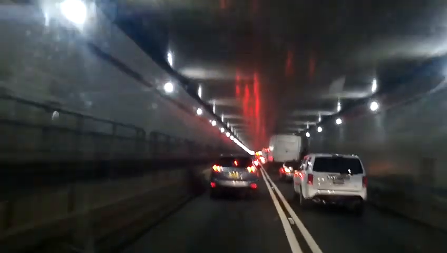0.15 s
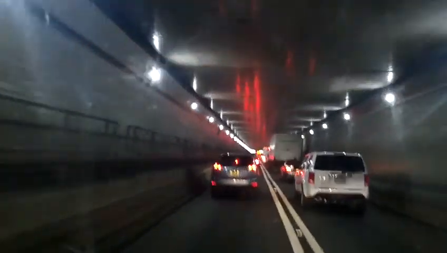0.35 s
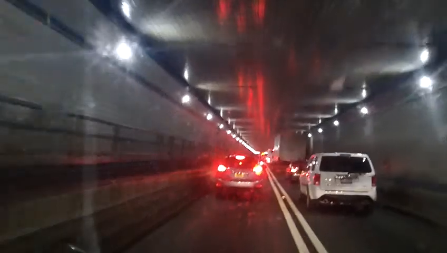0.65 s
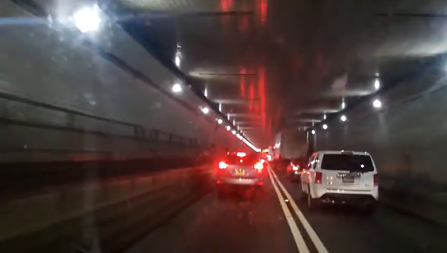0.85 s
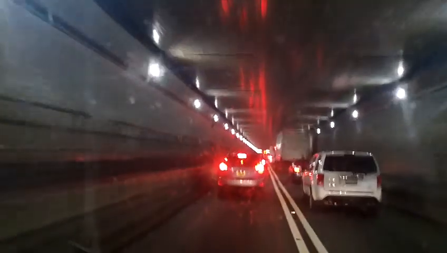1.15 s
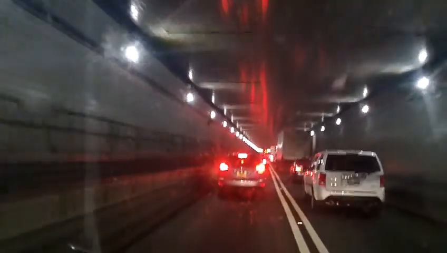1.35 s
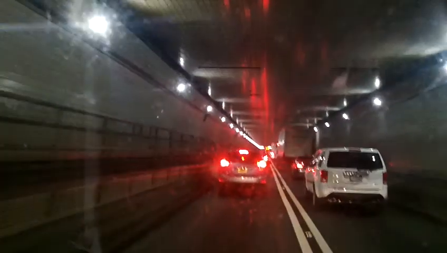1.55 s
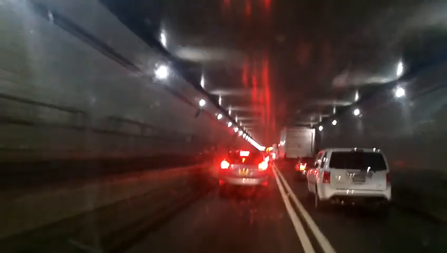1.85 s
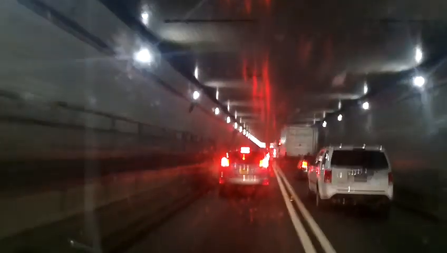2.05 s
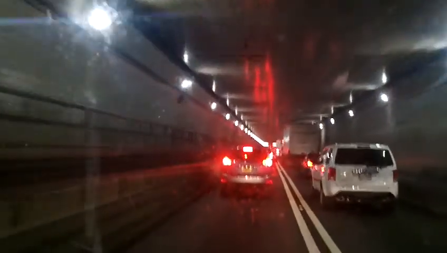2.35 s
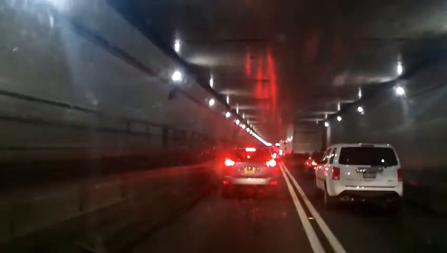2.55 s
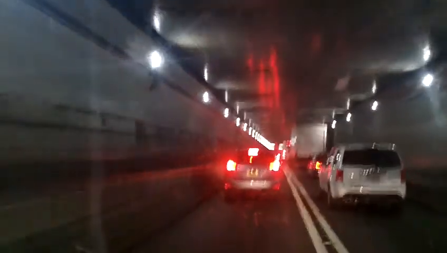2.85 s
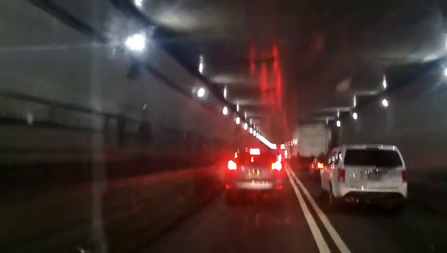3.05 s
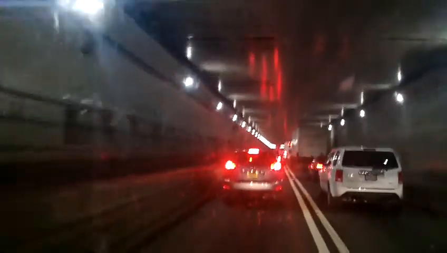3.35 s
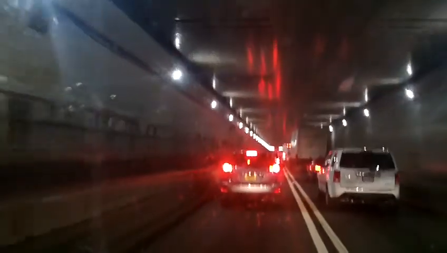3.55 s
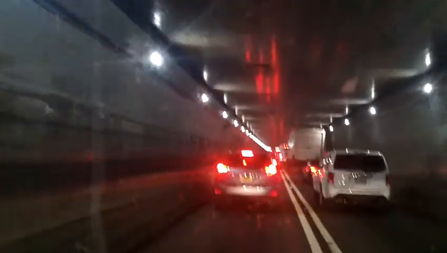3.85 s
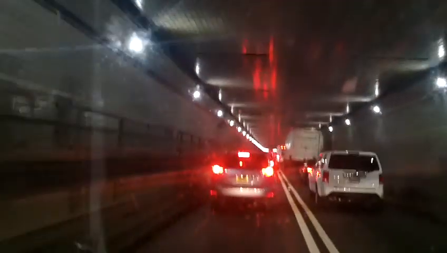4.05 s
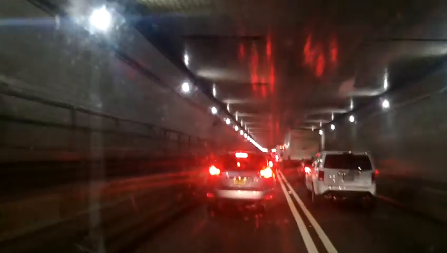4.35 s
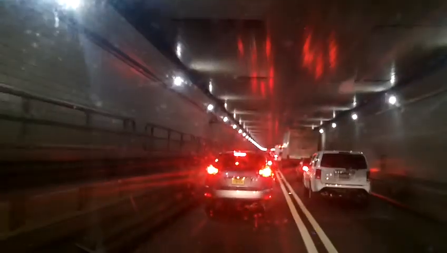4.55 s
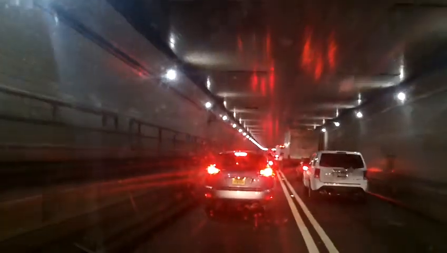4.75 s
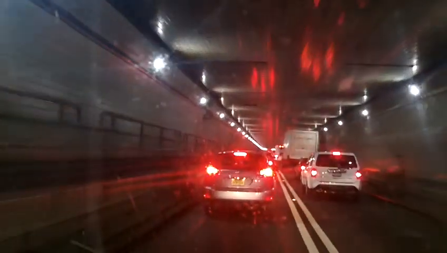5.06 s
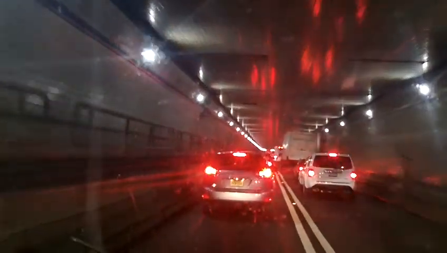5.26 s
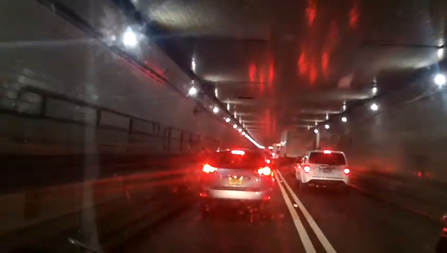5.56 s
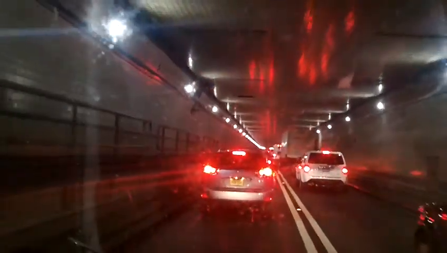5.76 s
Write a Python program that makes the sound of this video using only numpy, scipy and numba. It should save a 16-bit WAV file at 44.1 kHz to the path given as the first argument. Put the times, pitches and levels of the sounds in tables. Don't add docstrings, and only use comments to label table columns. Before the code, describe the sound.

A small camera microphone in a car cabin picks up heavy low rumble and fluttering thuds, around eighteen a second, swelling and easing over rough patches. A low engine hum and muffled tunnel roar sit underneath. Brief high plastic squeaks tick in midway. Near the end the car almost stops, the bumping fades, and a soft idle hum returns.

```python
import sys
import numpy as np
from scipy import signal
from scipy.fft import rfft, irfft, next_fast_len
from scipy.io import wavfile
from scipy.ndimage import uniform_filter1d
from numba import njit

SR = 44100
rng = np.random.default_rng(int(sys.argv[2]) if len(sys.argv) > 2 else 0)


def decibels_to_gain(level_db):
    exponent = np.asarray(level_db, float) / 20
    return 10 ** exponent


def master_out(mix):
    frames = np.transpose(np.atleast_2d(mix))
    ceiling = np.clip(frames, -1, 1)
    pcm = np.round(ceiling * 32767).astype(np.int16)
    wavfile.write(sys.argv[1], SR, pcm)


N = 260631


def evened(x):
    return x / np.sqrt(np.mean(x ** 2) + 1e-20)


def curve(rows, column):
    rows = np.array(rows)
    return np.interp(np.arange(N) / SR, rows[:, 0], rows[:, column])


def coloured(x, db_of_hz):
    size = next_fast_len(N + SR)
    return irfft(rfft(x, size) * decibels_to_gain(db_of_hz(np.fft.rfftfreq(size, 1 / SR))), size)[:N]


def shaped(x, points):
    point_hz, point_db = np.transpose(points)
    return coloured(x, lambda hz: np.interp(np.log(hz + 1), np.log(point_hz + 1), point_db))


def resonant_noise(centre_hz, width_hz):
    noise = rng.standard_normal(N)
    return evened(coloured(noise, lambda hz: -20 * np.log10(1 + ((hz - centre_hz) / width_hz) ** 2)))


# start_s, level_db, length_s
ROAD_PATCHES = [(-.1, -12, .17), (0.089, 0, 0.0091), (.197, -4, 0.026), (.29, -0.5, 0.062),
                (0.45, 13.5, 0.039), (0.574, -2.5, 0.025), (0.704, 9, .05), (0.97, 1.5, 0.066),
                (1.106, 1.5, .18), (1.216, -2.5, .07), (1.539, 5, 0.05), (1.673, -6.5, .07), (1.88, 4, .15),
                (2.062, -0.2, .12), (2.271, 5.5, .12), (2.471, 8.5, .11), (2.638, -2, .111),
                (2.826, 9.5, .14), (3.023, 6.5, .05), (3.1, 9, .11), (3.453, -5, .118), (3.622, 5, .11),
                (3.874, 1.5, 0.11), (5.156, -5, 0.053), (5.533, -14, .01)]


def shake_size(rise_s=.045, fade_s=.08, smooth_road_db=-29):
    t = np.arange(N) / SR
    size = decibels_to_gain(smooth_road_db)
    for start_s, level_db, length_s in ROAD_PATCHES:
        since_s = np.maximum(t - start_s, 0)
        swell = 1 - np.exp(-since_s / rise_s)
        after = np.maximum(since_s - length_s, 0) / fade_s
        size = size + decibels_to_gain(level_db) * swell * np.exp(-after ** 2)
    return size


# time_s, rate_hz
SHAKE_RATE = [(0.0, 18.74), (0.317, 20.21), (0.39, 9.39), (0.626, 22.08), (0.78, 16.09), (0.84, 23.02),
              (0.957, 18.79), (1.369, 18.31), (1.44, 12.5), (1.646, 18.8), (2.823, 17.35), (2.884, 13.36),
              (3.031, 18.2), (3.17, 14.54), (3.753, 14.88), (3.813, 12.96), (4.2, 12.4), (5.91, 18.85)]


def body_shake(size, start_rad=-.47, sway_db=-13):
    turns = np.cumsum(curve(SHAKE_RATE, 1)) / SR
    rocking = np.sqrt(2) * np.cos(2 * np.pi * turns + start_rad)
    sway = decibels_to_gain(sway_db) * resonant_noise(centre_hz=10, width_hz=5)
    return size * (rocking + sway)


# frequency_hz, density_db_per_hz
KNOCK_COLOUR = [(20, -28), (30, -4.5), (70, 5), (150, -2), (300, -12), (600, -26.5), (1200, -96)]
# time_s, load_db
SPRING_LOAD = [
    (0, 2),
    (2, 0),
    (4, -0.5),
    (4.3, -11),
    (4.8, -13),
    (5.2, 0),
    (5.91, -1),
]


def rumble(size, knock_db=-16.5, boom_db=-17, knock_share=0.43, boom_share=.7, knock_load=0.48):
    load_db = curve(SPRING_LOAD, 1)
    knocks = evened(shaped(rng.standard_normal(N), KNOCK_COLOUR))
    boom = resonant_noise(centre_hz=39.14, width_hz=10)
    knocks = decibels_to_gain(knock_db + knock_load * load_db) * knocks * size ** knock_share
    return knocks + decibels_to_gain(boom_db + load_db) * boom * size ** boom_share


# time_s, pitch_hz, level_db
ENGINE_HUM = [(0, 73.9, -24.5), (.6, 72.83, -18), (1, 72.84, -22.5), (1.5, 75.75, -25.5), (2, 72, -28.5),
              (2.3, 59.53, -38), (4.2, 39.57, -41), (4.8, 38.85, -38), (5.2, 39.68, -25), (5.6, 45.22, -24),
              (5.91, 46, -26.5)]


def engine_hum(waver=.03, uneven_db=3):
    drift, swell = (evened(uniform_filter1d(row, size=4000)) for row in rng.standard_normal((2, N)))
    turns = np.cumsum(curve(ENGINE_HUM, 1) * (1 + waver * drift)) / SR
    level = decibels_to_gain(curve(ENGINE_HUM, 2) + uneven_db * swell)
    return np.sqrt(2) * level * np.sin(2 * np.pi * turns)


# start_s, peak_db, pitch_hz, length_s
TRIM_SQUEAKS = [(3.318, -45, 5700, 0.023), (3.322, -36, 2940, .03), (3.345, -36.5, 2400, 0.022),
                (3.407, -33, 2310, 0.018), (3.477, -28.5, 2270, 0.02), (3.554, -31.5, 2420, 0.012),
                (3.621, -35, 2343, 0.013), (3.906, -26.5, 2373, 0.019), (3.991, -23.5, 2300, 0.017),
                (4.064, -27, 2340, 0.021), (4.531, -35, 3426, 0.018), (5.097, -26, 2370, 0.019),
                (5.609, -36.5, 3114, 0.018)]


def trim_squeaks(waver=0.025):
    out = np.zeros(N)
    for start_s, peak_db, pitch_hz, length_s in TRIM_SQUEAKS:
        count = len(np.arange(0, length_s, 1 / SR))
        wander = evened(uniform_filter1d(rng.standard_normal(2000), size=60))[:count]
        turns = pitch_hz * np.cumsum(1 + waver * wander) / SR
        tone = np.sin(2 * np.pi * turns) * signal.windows.tukey(count, .7)
        out[round(start_s * SR):][:count] += decibels_to_gain(peak_db) * tone
    return out


# frequency_hz, density_db_per_hz
WASH_COLOUR = [(15, -6), (40, 1), (70, -9.5), (140, -11), (190, -15), (260, -13), (400, -21.5), (750, -21),
               (950, -27.5), (2400, -30), (3300, -35), (3700, -40), (7000, -52.5), (16000, -53.5)]
# time_s, level_db
WASH_LEVEL = [(0, -26), (.9, -23.5), (1.5, -25.5), (2.5, -25.5), (3.4, -26.5), (4.2, -23.5), (5, -23.5),
              (5.91, -24)]


def tunnel_wash(patchy_db=0.64, flicker_db=-0.25):
    frames = N // 128 + 5
    real, imaginary, patches = rng.standard_normal((frames, 257, 3)).T
    patches = uniform_filter1d(patches, size=6, axis=0)
    patches = evened(uniform_filter1d(patches, size=24, axis=1))
    flicker = evened(uniform_filter1d(rng.standard_normal(frames), size=5))
    spectrum = (real + 1j * imaginary) * decibels_to_gain(patchy_db * patches + flicker_db * flicker)
    noise = signal.istft(spectrum, nperseg=512, noverlap=384)[1][:N]
    return decibels_to_gain(curve(WASH_LEVEL, 1)) * evened(shaped(noise, WASH_COLOUR))


def scene():
    size = shake_size()
    return (body_shake(size) + rumble(size) + engine_hum() + trim_squeaks() + tunnel_wash())[None]


@njit
def stepped_gain(x, tick, step, fall, rise, hold, chase, top, settle, sink, low, memory, gain):
    out, peak, since_down, since_up, limit = np.empty(len(x)), 0., hold, rise, top
    for n in range(len(x)):
        peak = max(abs(x[n]), peak * memory)
        if tick[n]:
            since_down, since_up = since_down + 1, since_up + 1
            limit = max(limit * sink, settle) if since_down < chase else top
            may_rise = since_down >= hold and since_up >= rise and gain * step < 1.01
            if peak * gain > limit and since_down >= fall:
                gain, since_down = gain / step, 0.
            elif peak * gain < low and may_rise:
                gain, since_up = gain * step, 0.
        out[n] = gain
    return out


def gain_control(x, clock_hz=4800, step_db=.75, fall_ticks=2, rise_ticks=16., hold_s=0.0105, chase_s=.008,
                 top_db=-11.5, settle_db=-14, sink_db_per_s=-400, low_db=-15, memory_s=0.00035, start_db=-3):
    tick = np.diff(np.floor(np.arange(N + 1) * clock_hz / SR)) > 0
    memory = np.exp(-1 / (memory_s * SR))
    sink = decibels_to_gain(sink_db_per_s / clock_hz)
    return x * stepped_gain(x, tick, decibels_to_gain(step_db), fall_ticks, rise_ticks, hold_s * clock_hz,
                            chase_s * clock_hz, decibels_to_gain(top_db), decibels_to_gain(settle_db), sink, decibels_to_gain(low_db),
                            memory, decibels_to_gain(start_db))


# frequency_hz, gain_db
BAND_SHAPE = [(3000, -1), (7000, -4), (7700, -12), (7760, -44), (7930, -40), (8000, -9), (9500, -4.5),
              (11820, -4), (11870, -18), (11920, -5), (14300, -3.5), (15040, -9), (15100, -47)]


def band_shape(x, block_hz=4):
    blocked = signal.lfilter(*signal.butter(1, block_hz, "high", fs=SR), x)
    return shaped(blocked, BAND_SHAPE)


def starved_treble(x, floor_db=-84, slope=0.37, from_hz=3000):
    hz, _, z = signal.stft(x, SR, nperseg=256)
    band_db = 10 * np.log10(uniform_filter1d(abs(z) ** 2, size=7, axis=0) + 1e-14)
    under_db = np.minimum(band_db - floor_db, 0) * (hz[:, None] > from_hz)
    return signal.istft(z * decibels_to_gain(slope * under_db), SR, nperseg=256)[1][:N]


def treble_holes(x, under_db=1.5, floor_db=-104, from_hz=6000):
    hz, _, z = signal.stft(x, SR, nperseg=2048)
    band_db = 10 * np.log10(uniform_filter1d(abs(z) ** 2, size=6, axis=0) + 1e-14)
    usual_db = np.median(band_db[(hz > 9000) & (hz < 14000)], axis=0)
    faint = band_db < np.maximum(usual_db - under_db, floor_db)
    dropped = faint & (hz[:, None] > from_hz)
    return signal.istft(z * ~dropped, SR, nperseg=2048)[1][:N]


def roll_off(x):
    return signal.sosfilt(signal.butter(12, 15720, fs=SR, output="sos"), x)


def record(dry):
    heard = band_shape(gain_control(dry[0]))
    mix = treble_holes(starved_treble(heard))[None]
    return roll_off(mix)


dry = scene()
out = record(dry)
master_out(out)
```